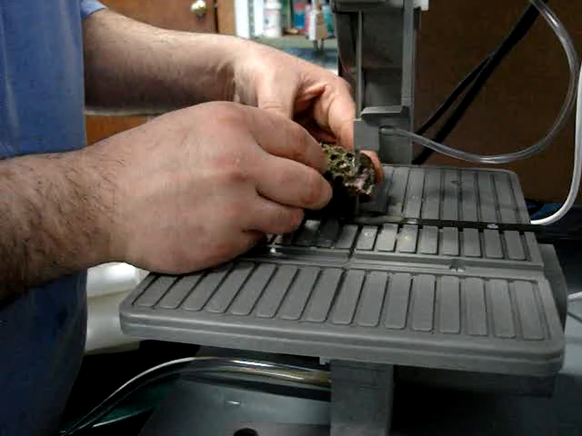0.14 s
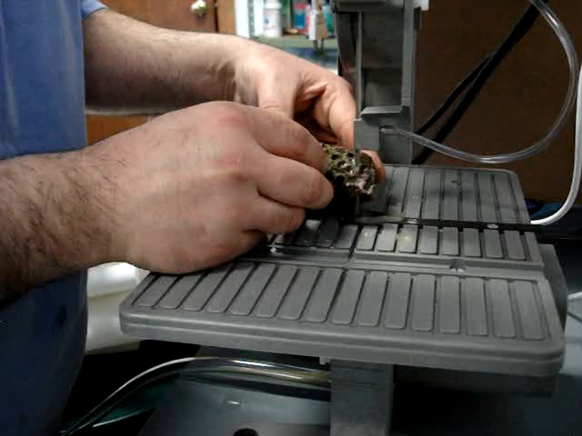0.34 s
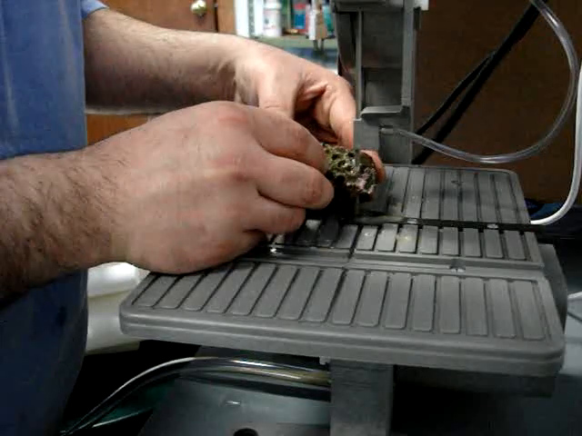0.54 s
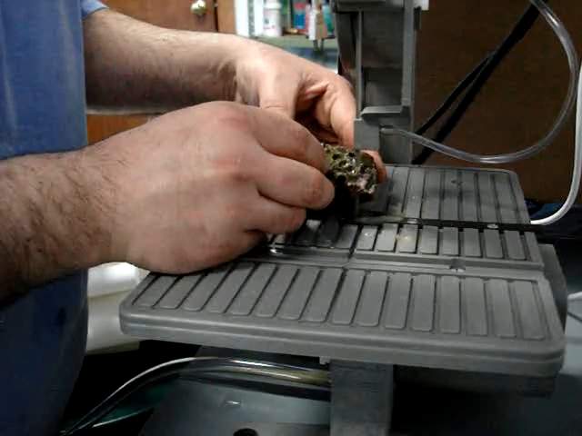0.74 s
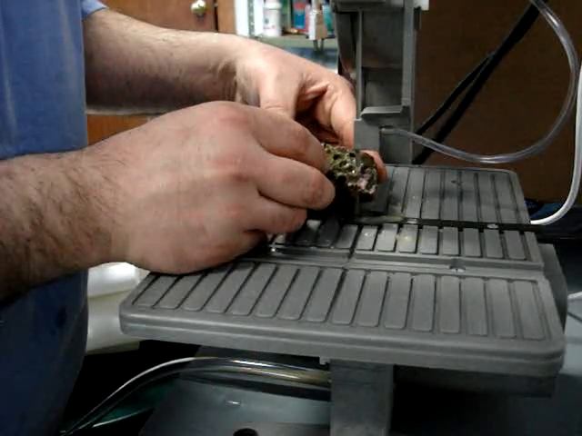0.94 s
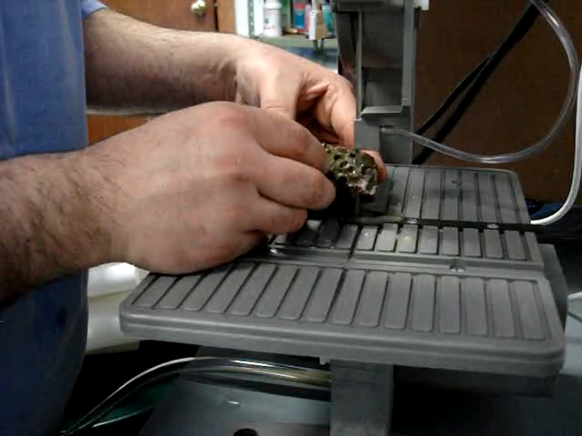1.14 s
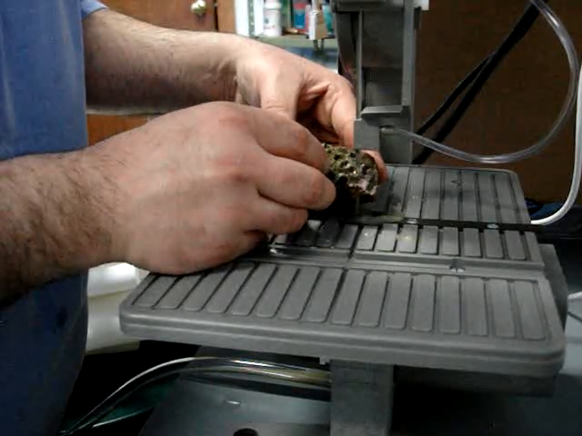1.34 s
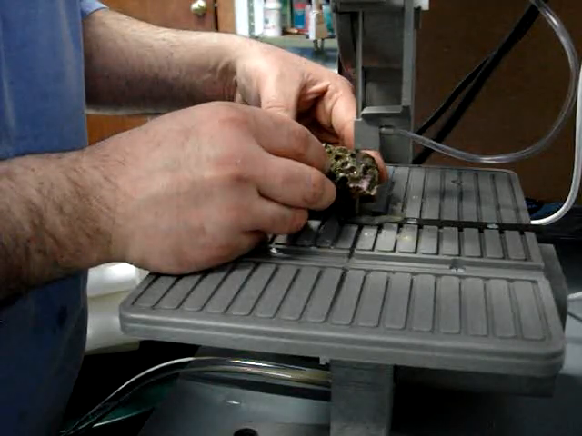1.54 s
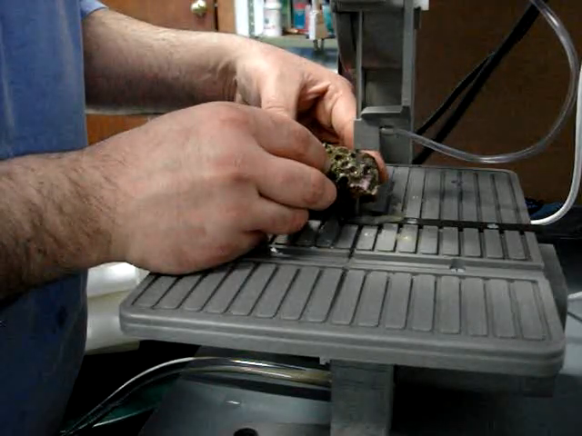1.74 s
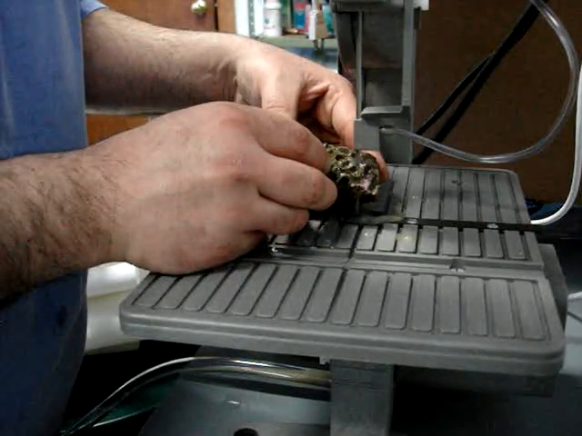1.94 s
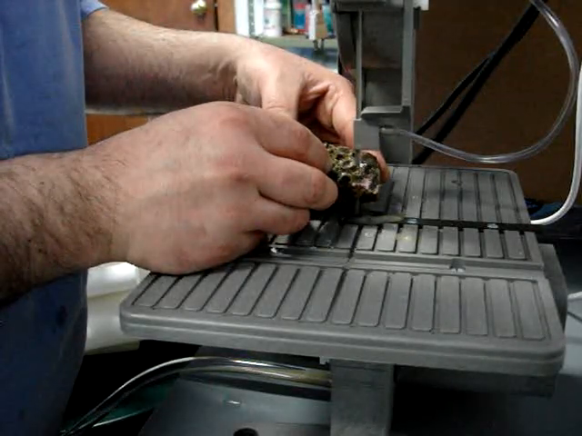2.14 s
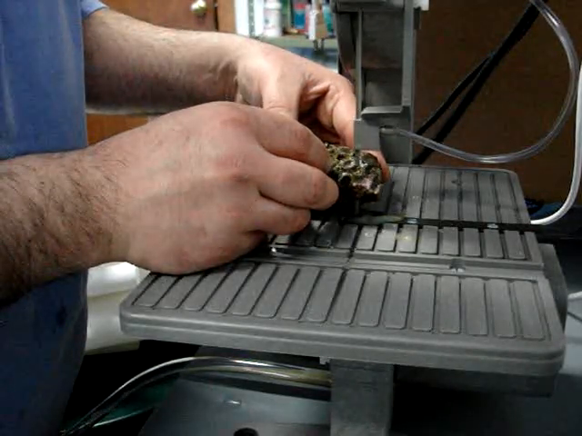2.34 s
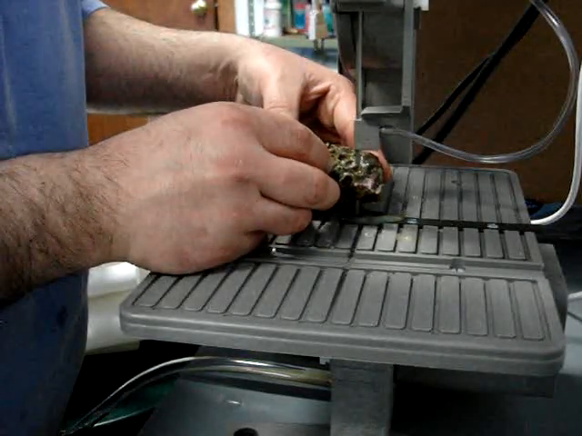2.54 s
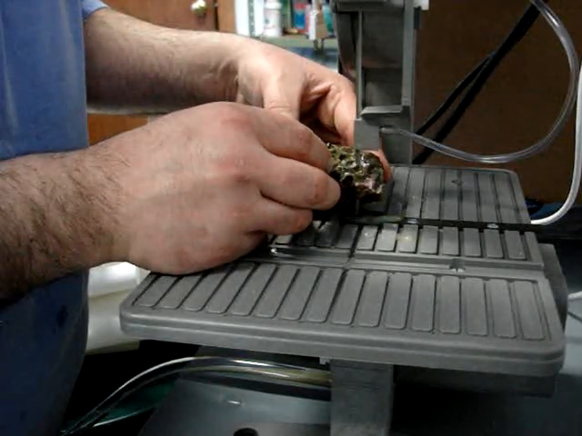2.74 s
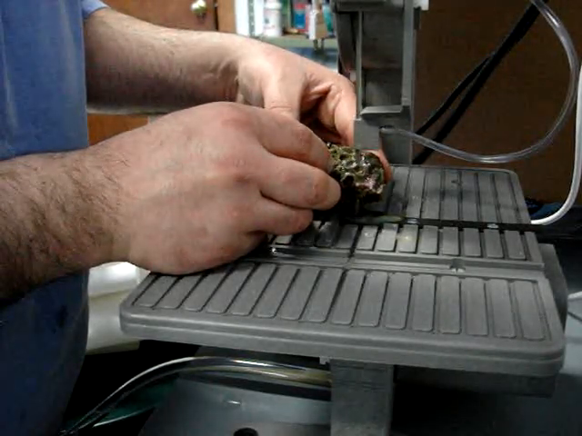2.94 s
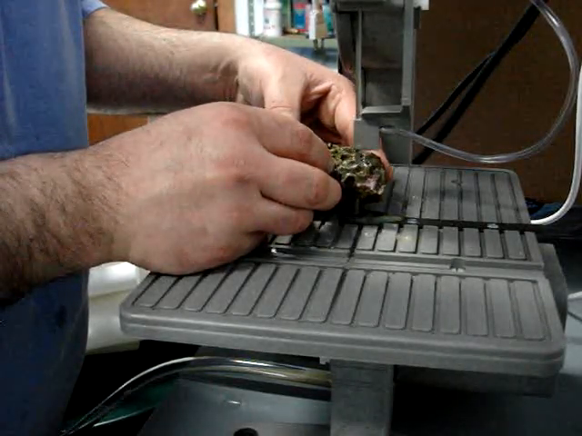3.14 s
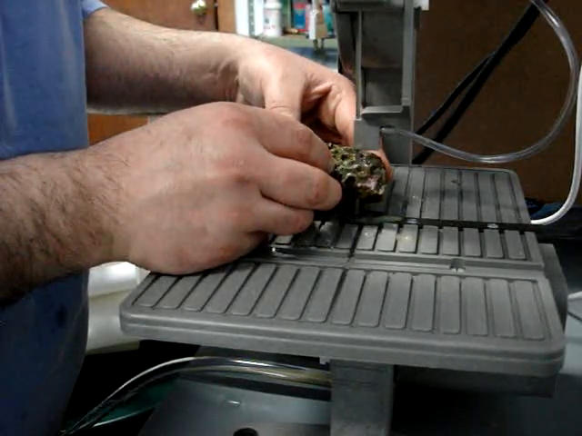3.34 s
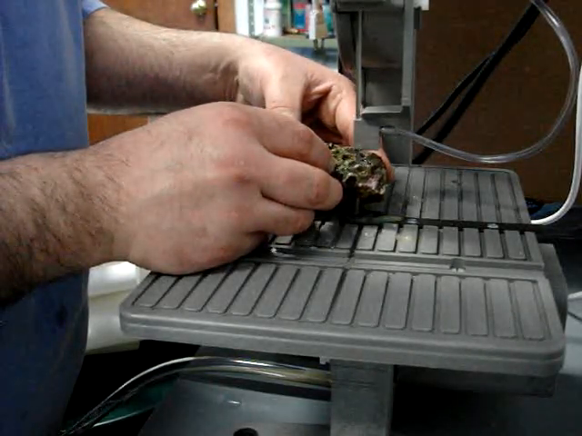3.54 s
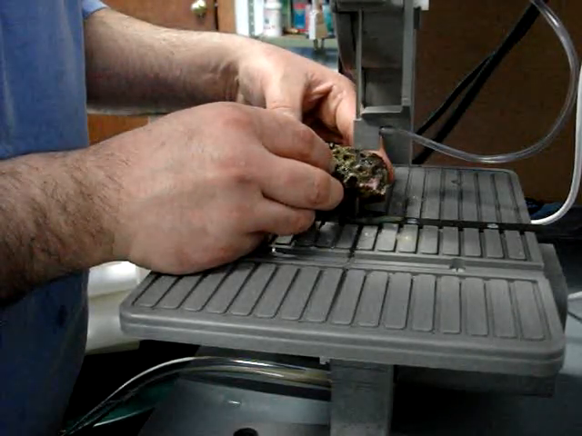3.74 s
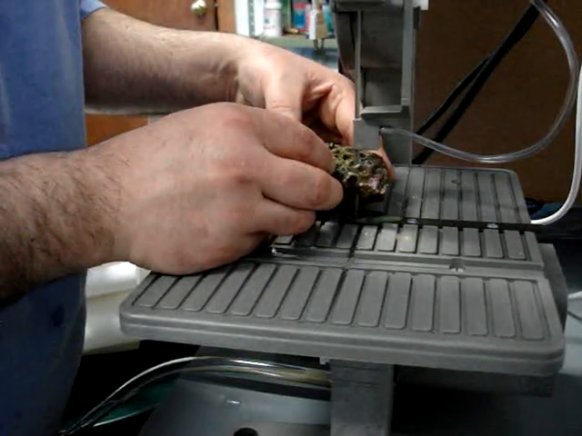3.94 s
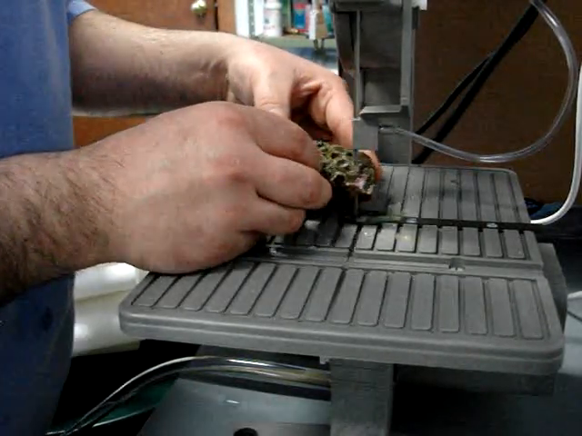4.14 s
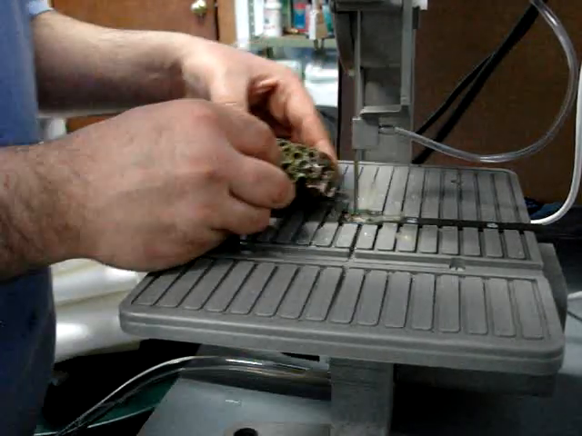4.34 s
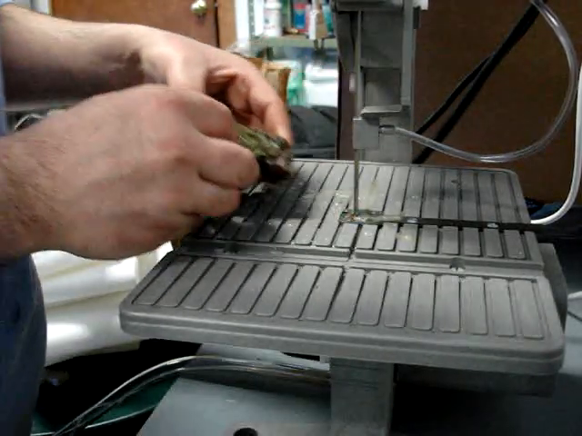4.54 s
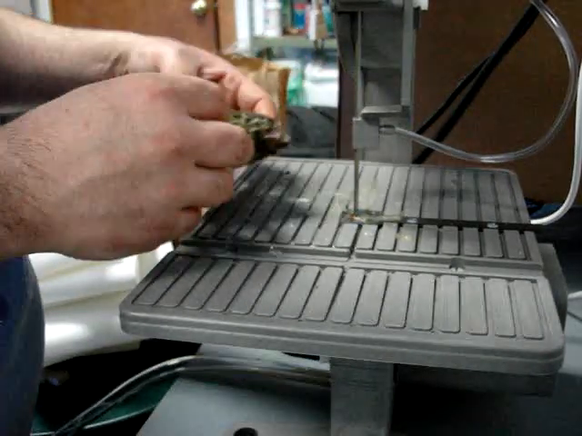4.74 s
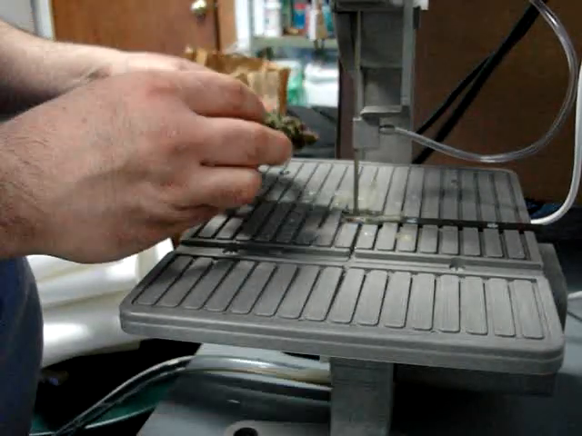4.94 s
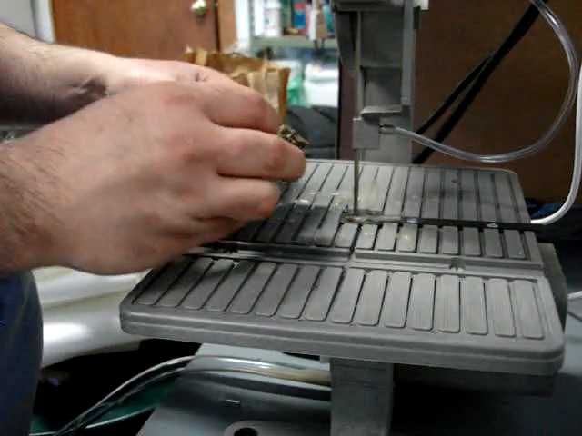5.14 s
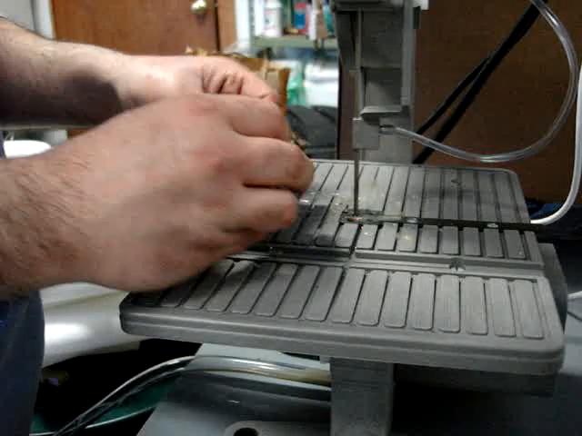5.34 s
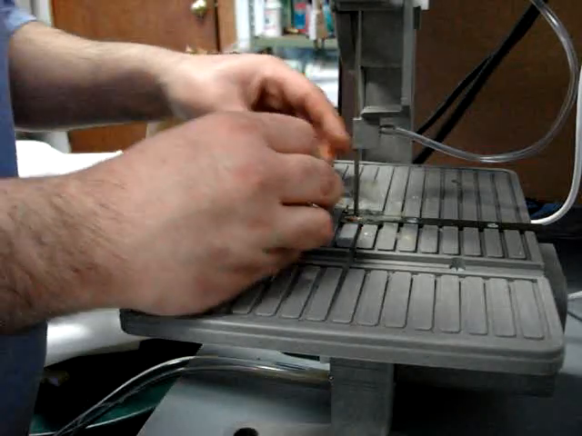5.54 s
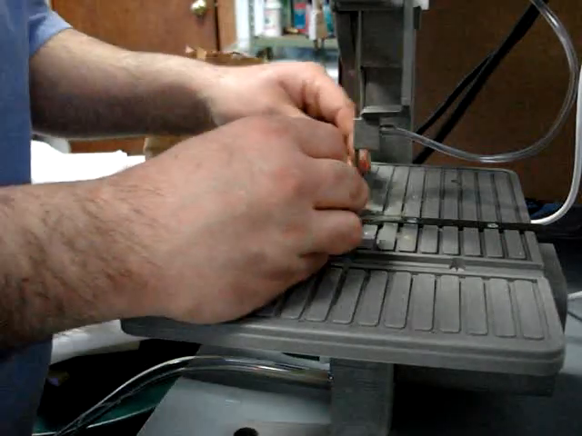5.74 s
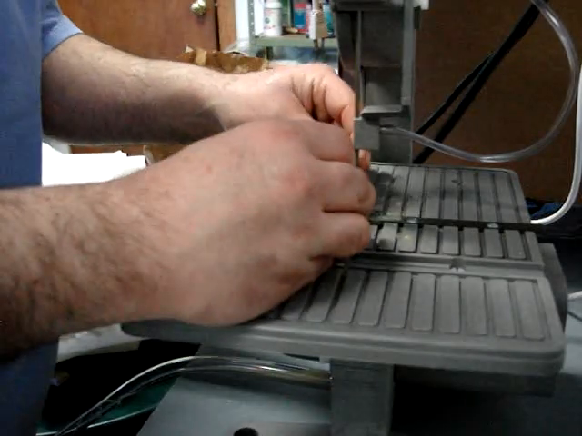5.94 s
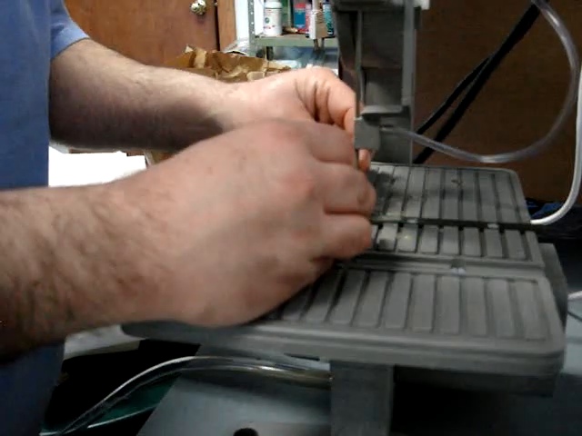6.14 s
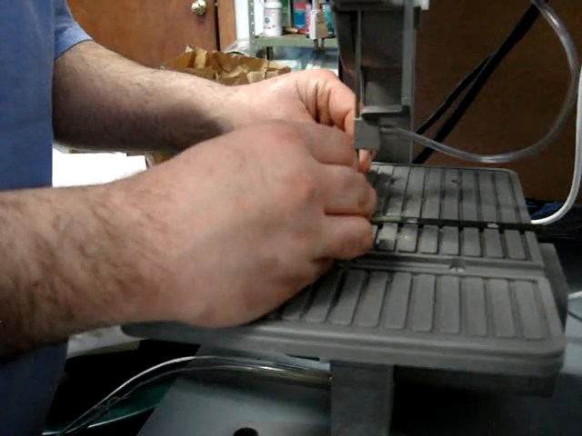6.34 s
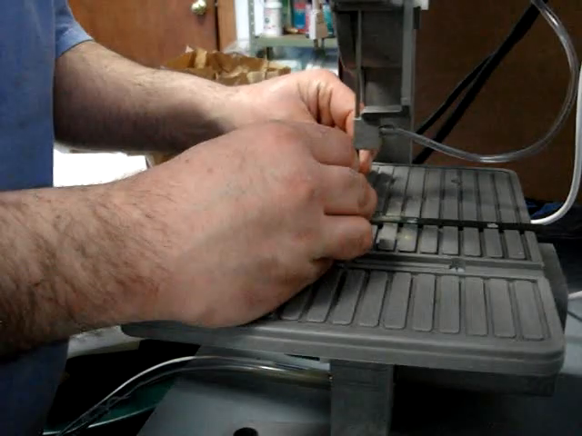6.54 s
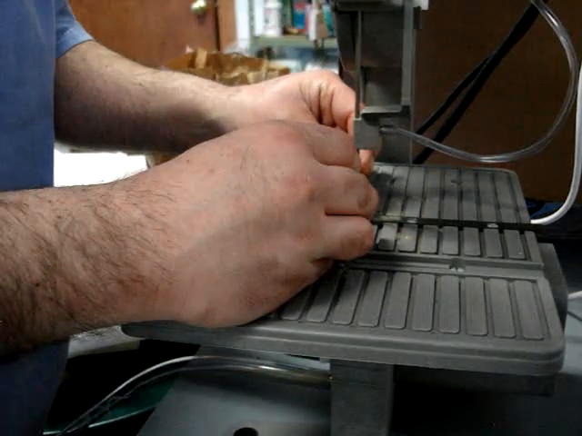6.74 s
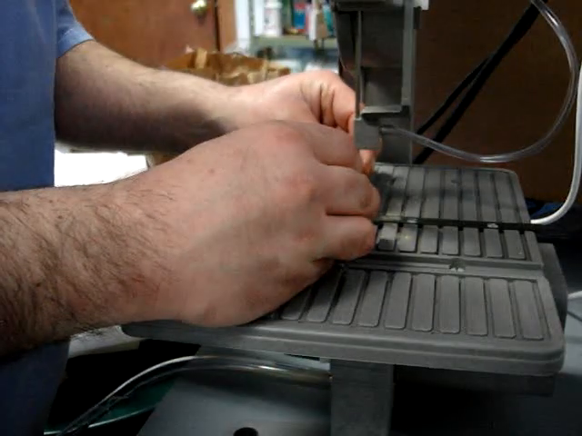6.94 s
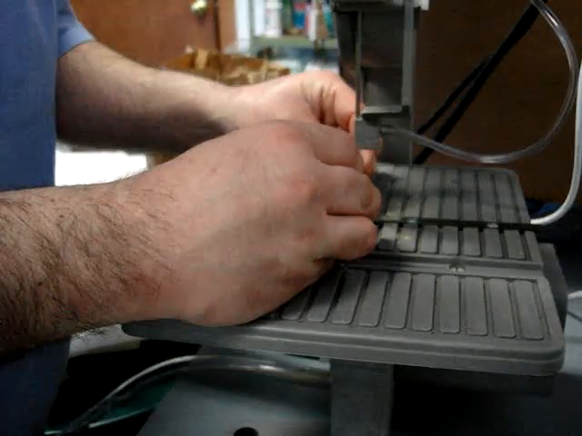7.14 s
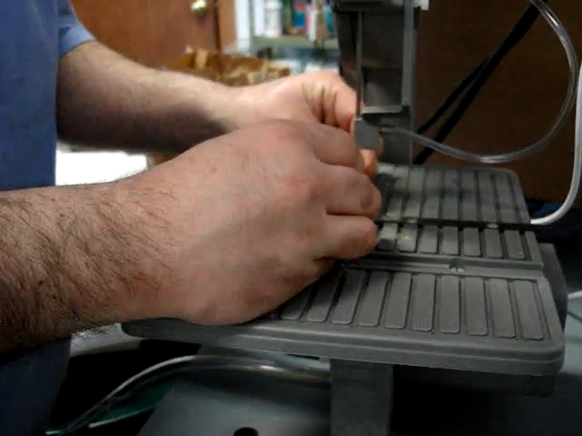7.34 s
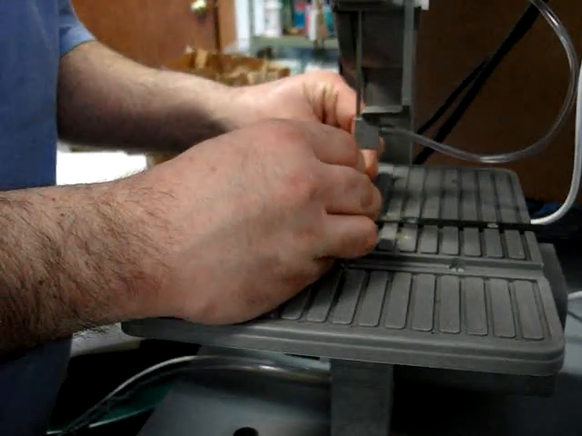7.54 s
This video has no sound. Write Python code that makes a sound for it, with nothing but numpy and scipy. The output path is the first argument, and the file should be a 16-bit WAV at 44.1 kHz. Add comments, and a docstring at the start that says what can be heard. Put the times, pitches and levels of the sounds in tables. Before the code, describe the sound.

A small band saw grinds through coral with a gritty, ringing hiss, squeaks free, drones louder, then starts a second cut.

```python
"""Band saw cutting coral

A piece of coral is pushed through a small diamond band saw on a workbench. Grit grinds, the blade chatters in
its guides and a hissing ring shifts with the push. The blade squeals as the cut breaks through, the drone
swells up over the next second or so, and a second cut begins. Chips snap off and the table thuds softly. One
close microphone in a small room."""
import sys
import numpy as np
from scipy import signal
from scipy.fft import rfft, irfft
from scipy.io import wavfile

SR = 44100
rng = np.random.default_rng(int(sys.argv[2]) if len(sys.argv) > 2 else 0)


def digitize_waveform(pressure):
    """Quantize a signal to 16-bit integers and store it at the path in sys.argv[1].

    Rows of a 2-D input are taken as channels; values are limited to [-1, 1].
    """
    field = np.atleast_2d(pressure).T
    bounded = np.clip(field, -1, 1)
    quanta = np.round(bounded * 32767).astype(np.int16)
    wavfile.write(sys.argv[1], SR, quanta)


N = 334719
TIME = np.arange(N) / SR
TOUCH_S, LEAVE_S = 0.018, 0.021  # time the coral takes to meet and to leave the blade

# How the hand feeds the coral in each cut: t/s, grit level/dB, fizz level/dB, ring of the slot f/Hz
FIRST_CUT = [(0, -29.5, -31, 4730), (0.22, -38.5, -31, 4740), (0.7, -32.5, -29, 4760),
             (1.25, -34, -27.5, 7000), (1.92, -35, -28, 6400), (2.18, -29.5, -27, 4400),
             (3.08, -30, -30, 4060), (3.38, -33.5, -30, 4900), (3.55, -28.5, -30.5, 5220),
             (4.0, -30, -28, 4930), (4.09, -43, -37.5, 3630), (4.33, -41, -34.5, 3200)]
SECOND_CUT = [(6.47, -39, -35.5, 3060), (6.8, -37.5, -31.5, 3930), (7.12, -35.5, -31.5, 3660),
              (7.2, -27.5, -30, 5600), (7.59, -32.5, -26, 5700)]


def hand_feed(chatter_db=(-20, -12.5), chatter_growth=0.51):
    """The push sets the strength of grit, fizz and chatter in both cuts, and the pitch of the slot."""
    strengths = np.zeros((3, N))
    for cut, base_db in zip((FIRST_CUT, SECOND_CUT), chatter_db):
        grit_db, fizz_db, _ = curve(cut)
        strengths += contact(cut) * gain_of([grit_db, fizz_db, base_db + chatter_growth * grit_db])
    slot_hz = curve(FIRST_CUT + SECOND_CUT)[2]
    return (*strengths, slot_hz)


# Tone colour of the coarse grit and of the fine fizz: f/Hz, relative level/dB
GRIT_COLOUR = [(300.0, -25.5), (1500.0, -24), (3200.0, -5), (3900.0, -4), (4600.0, 2.5), (5700.0, -10),
               (6300.0, -39.5), (7200.0, -1.5), (10000.0, -19.5)]
FIZZ_COLOUR = [(1000.0, -63), (5500.0, -2.5), (6700.0, -6), (7500.0, -8), (8100.0, -6.5), (8800.0, -5),
               (9400.0, -4.5), (10000.0, -13.5)]
# Pitches at which the steel blade and its wheels ring: f/Hz, width/Hz, boost/dB
BLADE_RINGS = [(244.7, 19, 9.5), (467, 47, 8.5), (1274, 62, 12), (1383, 140, 6), (1715, 120, 3),
               (2596, 260, 7.5), (2950, 90, 2.5), (3680, 73, 5.5), (3850, 70, 2), (3973, 110, 6.5),
               (4390, 70, 6), (4500, 80, 0), (4960, 180, 4.5), (5860, 96, 7), (6780, 190, 6.5)]


def grinding(turns, drone_db, coarse, fine, slot_hz, flicker_db=3.0):
    """Diamond grains scratch the coral and the guides; the pressure ripples as the wheels turn."""
    # Even the free blade rubs its guides; that hiss gets louder along with the drone.
    coarse = np.hypot(coarse, gain_of(0.69 * drone_db - 17.5))
    fine = np.hypot(fine, gain_of(0.72 * drone_db - 19.5))
    ripple_db = 0.62 * np.cos(2 * np.pi * turns) + np.cos(8 * np.pi * turns)
    pressure = gain_of(ripple_db + 0.95 * wander(31))
    grit = body(rng.standard_normal(N) * pressure, GRIT_COLOUR, BLADE_RINGS)
    fizz = body(rng.standard_normal(N) * pressure, FIZZ_COLOUR, BLADE_RINGS)
    treble = signal.sosfiltfilt(signal.butter(4, 7500, "high", fs=SR, output="sos"), fizz)
    fizz = fizz - treble + treble * gain_of(flicker_db * wander(98))  # the treble flickers
    return coarse * grit + fine * fizz + np.sqrt(coarse * fine) * slot_ring(pressure, slot_hz)


def slot_ring(pressure, hz, width_hz=900):
    """Scratches make the sawn slot ring with a hiss whose pitch slides as the coral is pushed."""
    spin = np.exp(2j * np.pi * np.cumsum(hz) / SR)
    decay = np.exp(-np.pi * width_hz / SR)
    scratches = impacts(20000, 1.0) * pressure
    # Dividing by spin, smoothing and multiplying back keeps only the sound near hz.
    ring = spin * signal.lfilter([1], np.poly([decay, decay]), scratches / spin)
    return gain_of(-6) * normalise(ring.real)


# Tone colour of the blade slapping its guides: f/Hz, relative level/dB
CHATTER_COLOUR = [(100.0, -61.5), (400.0, -10), (900.0, -2.5), (1120.0, -12.5), (1300.0, -2), (1600.0, 1),
                  (2100.0, -4), (2700.0, -5), (3300.0, -2), (4500.0, -9), (9000.0, -32)]


def chatter(turns, drone_db, load, whine_hz=1715, hz_per_db=2.5, build_db=3.5):
    """The blade slaps its guides and whines in them, hardest twice in each turn of the wheels."""
    sway = gain_of(0.85 * np.cos(2 * np.pi * turns) + 1.8 * np.cos(4 * np.pi * turns))
    free_running = gain_of(0.78 * drone_db - 11.5)
    slaps = body(normalise(impacts(9000, 0.69) * sway), CHATTER_COLOUR, BLADE_RINGS)
    pitch_hz = whine_hz + hz_per_db * (drone_db - drone_db.mean())
    whine = normalise(sway * tone(pitch_hz, .015, 60, .6, 40))
    depth = contact(FIRST_CUT) * (TIME / FIRST_CUT[-1][0] - .5)
    whine_gain = by_cut(-7, -5, -7) * gain_of(build_db * depth)  # grows as the first cut deepens
    return np.hypot(load, free_running) * (slaps + whine_gain * whine)


# Squeals as the cut breaks through: start t/s, length/s, level/dB
SQUEALS = [(4.24, 0.022, -21.5), (4.281, 0.067, -23)]
# Tone colour of their scrape: f/Hz, relative level/dB
SQUEAL_COLOUR = [(500, -34), (4000, -6), (7900, -11), (8400, 2), (9800, -4.5)]
# Pitches at which the squeals ring: f/Hz, width/Hz, boost/dB
SQUEAL_RINGS = [(4640, 330, 18), (8440, 200, 3), (9240, 300, 3)]


def squeal(rise_s=0.0058, fall_s=0.014):
    """The last sliver of coral drags on the blade and makes it sing."""
    drag = sum(gain_of(db) * held(s, s + length, rise_s, fall_s) for s, length, db in SQUEALS)
    scrape = rng.standard_normal(N) * drag * gain_of(.5 * wander(120))
    return body(scrape, SQUEAL_COLOUR, SQUEAL_RINGS)


# Notes of the lightly touched blade: f/Hz, width/Hz, boost/dB
GRAZE_RINGS = [(3830, 190, 26), (4470, 260, 15)]


def graze(start_s=6.44, length_s=.78, fade_s=.2, level_db=-36.5, uneven_db=2.5):
    """Lightly touched as the second cut begins, the blade rings in two thin, unsteady notes."""
    touch = held(start_s, start_s + length_s, TOUCH_S, fade_s)
    touch *= gain_of(level_db + uneven_db * wander(19))
    return body(rng.standard_normal(N) * touch, GRIT_COLOUR, GRAZE_RINGS)


# Chips snapping off the coral: t/s, relative level/dB
CHIPS = [(3.863, -10), (4.1, -11), (6.481, -12), (6.639, -9), (7.052, -14), (7.176, -5)]


def chips(decay_s=.0015):
    """Each chip is a short crack that rings the blade."""
    fade = np.exp(-TIME[:SR // 50] / decay_s)
    cracks = signal.oaconvolve(strikes(CHIPS), fade)[:N] * rng.standard_normal(N)
    return gain_of(-9) * body(cracks, GRIT_COLOUR, BLADE_RINGS)


# How loud the drone of motor and frame sounds: t/s, level/dB
DRONE = [(0, -41.5), (0.3, -45), (0.6, -43), (2.0, -42), (2.5, -39.5), (3.55, -41), (4.07, -34.5),
         (4.38, -39), (5.05, -25), (5.5, -22.5), (6.25, -21), (6.43, -19.5), (6.7, -29.5), (7.25, -31.5),
         (7.59, -38.5)]
# The motor's tones: f/Hz, relative level/dB, pitch drift as a share of f
MOTOR_TONES = [(119, -36, .002), (149.4, -32, .002), (219.8, -32, 0.0036), (360, -29, 0.008),
               (418.5, -28.5, 0.0036), (454, -27, 0.0028), (647, -18, 0.004), (797, -13.5, .003)]
# Tone colour of the rattling frame: f/Hz, relative level/dB
FRAME_COLOUR = [(40.0, -35), (90.0, -29.5), (140.0, -21), (250.0, -16), (380.0, -1), (540.0, -10.5),
                (720.0, -1), (1100.0, -7.5), (1500.0, -6), (1950.0, -5), (2150.0, -9), (3200.0, -24),
                (6000.0, -12), (10000.0, -48)]
# Pitches at which the cast frame and table ring: f/Hz, width/Hz, boost/dB
FRAME_RINGS = [(245, 20, 6), (445, 45, 3), (694, 42, 6.5), (793, 26, 6), (900, 24, 5), (958, 36, 7),
               (1024, 25, 7), (1175, 25, 8), (1270, 40, 8), (1345, 50, 9), (1425, 30, 5), (1735, 50, 7),
               (1782, 30, 7), (1916, 40, 7), (2500, 160, 7)]


def motor(drive_hz=698, uneven_db=1.55, boom_growth=1.86):
    """Bearings and drive rattle the frame under wavering tones; the bass swells faster than the rest."""
    drone_db, = curve(DRONE)
    knocks = impacts(8000, 0.94) * gain_of(uneven_db * wander(45))
    rattle = body(knocks, FRAME_COLOUR, FRAME_RINGS)
    bass_filter = signal.butter(2, [130, 280], "band", fs=SR, output="sos")
    boom = normalise(signal.sosfilt(bass_filter, impacts(3000, 0.97)))
    hum = sum(gain_of(db) * tone(hz, drift, 19.4, 0.39, 20) for hz, db, drift in MOTOR_TONES)
    drive = by_cut(-8, -13.5, -7) * tone(drive_hz, 0.009, 20.3, 0.42, 18)
    drone = gain_of(drone_db) * (gain_of(-1) * (rattle + hum) + drive)
    return drone + gain_of(boom_growth * drone_db - 9) * boom


# Dull bumps on the table: t/s, relative level/dB
BUMPS = [(0.119, -41), (0.234, -39), (1.204, -42), (1.429, -44), (1.77, -46), (2.424, -48), (2.749, -45),
         (3.384, -44), (4.109, -52), (4.279, -40), (5.919, -49), (6.209, -49), (6.489, -41)]


def table_bumps(rise_s=0.0044, per_s=110):
    """Soft pushes thud on the table; many tiny ones make it tremble, most while the blade cuts."""
    age = TIME[:SR // 10] / rise_s
    push = -age * np.exp(1 - age)
    tremble = normalise(signal.oaconvolve(impacts(per_s, 0.9), push)[:N])
    thuds = gain_of(1) * signal.oaconvolve(strikes(BUMPS), push)[:N]
    motion = thuds + by_cut(-57, -65, -72) * tremble
    return signal.sosfilt(signal.butter(1, 15, "high", fs=SR, output="sos"), motion)


# How long the room's echo takes to fade by 60 dB: f/Hz, t/s
ECHO_FADE = [(200, 0.3), (2000, 0.2), (10000, 0.11)]


def room(x, size=16384):
    """The walls of a small workshop send back scattered echoes; the treble dies first."""
    echoes = rng.standard_normal(size) * (rng.random(size) < 2500 / SR) * (TIME[:size] > .004)
    hz, t, spectrum = signal.stft(echoes, SR, nperseg=256)
    fade = gain_of(-60 * t / value_at(ECHO_FADE, hz)[:, None])
    tail = signal.istft(spectrum * fade, SR, nperseg=256)[1]
    return signal.oaconvolve(x, tail / np.linalg.norm(tail))[:N]


def body(x, colour, rings, size=16384):
    """A solid part shaken by x gives it a tone colour and rings at its own pitches."""
    hz = np.fft.rfftfreq(size, 1 / SR)
    peaks_db = sum(boost / (1 + (2 * (hz - f) / width) ** 2) for f, width, boost in rings)
    db = value_at(colour, hz) + peaks_db
    log_gain = np.log(gain_of(np.r_[db, db[-2:0:-1]]))
    spectrum = np.exp(np.conj(signal.hilbert(log_gain)))  # the ring comes after the blow, never before
    ring = np.fft.ifft(spectrum).real[:size // 2]
    return signal.oaconvolve(x, ring / np.linalg.norm(ring))[:N]


def impacts(per_s, spread_db):
    """A stream of tiny blows at random times and of random strength."""
    size = rng.standard_normal(N) * gain_of(spread_db * np.minimum(rng.exponential(1, N), 4))
    return normalise(size * (rng.random(N) < per_s / SR))


def strikes(rows):
    """One click for each row of t/s, level/dB."""
    clicks = np.zeros(N)
    for s, db in rows:
        clicks[round(s * SR)] += gain_of(db)
    return clicks


def tone(hz, drift, drift_rate_hz, shake, shake_rate_hz):
    """A pure tone whose pitch drifts and whose strength shakes."""
    cycles = np.cumsum(hz * (1 + drift * wander(drift_rate_hz))) / SR
    return np.sqrt(2) * np.sin(2 * np.pi * cycles) * (1 + shake * wander(shake_rate_hz))


def wander(rate_hz):
    """A smooth random wobble of typical size 1, up to about the given rate."""
    hz = np.fft.rfftfreq(8192, 1 / 1000)  # one point per millisecond
    slow = irfft(rfft(rng.standard_normal(8192)) / np.sqrt(1 + (hz / rate_hz) ** 6))
    return normalise(np.interp(TIME * 1000, np.arange(len(slow)), slow))


def held(start, end, rise_s, fall_s):
    """Fades in from start, stays at 1, and fades out by end."""
    return np.clip(np.minimum((TIME - start) / rise_s, (end - TIME) / fall_s), 0, 1)


def contact(cut):
    """1 while the coral is on the blade in this cut, fading to 0 on either side."""
    return held(cut[0][0] - TOUCH_S, cut[-1][0] + LEAVE_S, TOUCH_S, LEAVE_S)


def by_cut(first_db, second_db, free_db):
    """A gain with one value in each cut and another while the blade runs free."""
    first = (first_db - free_db) * contact(FIRST_CUT)
    second = (second_db - free_db) * contact(SECOND_CUT)
    return gain_of(free_db + first + second)


def curve(rows):
    """Joins a table's rows with straight lines over time, one curve per column."""
    times, *columns = np.transpose(rows)
    return [np.interp(TIME, times, column) for column in columns]


def value_at(points, hz):
    """Reads a table between its frequencies, along a scale of octaves."""
    f, value = np.transpose(points)
    return np.interp(np.log(hz + 1), np.log(f + 1), value)


def gain_of(db):
    """Turns decibels into a number to multiply by."""
    return 10 ** (np.asarray(db) / 20)


def normalise(x):
    """Scales a signal to a typical size (rms) of 1."""
    return x / np.sqrt(np.mean(x ** 2) + 1e-20)


def scene(wheel_hz=8.8, room_db=-13):
    """The saw in its room: chatter and grinding share the turning wheels; both channels are alike."""
    turns = np.cumsum(wheel_hz * (1 + 0.0407 * wander(0.4))) / SR
    drone_db, = curve(DRONE)
    coarse, fine, load, slot_hz = hand_feed()
    saw = motor() + chatter(turns, drone_db, load) + grinding(turns, drone_db, coarse, fine, slot_hz)
    saw = saw + squeal() + graze() + chips()
    mono = saw + gain_of(room_db) * room(saw) + table_bumps()
    return np.array([mono, mono])


def record(dry, edge_hz=10130):
    """Cuts off the highest treble steeply."""
    lowpass = signal.firwin(1023, edge_hz, window=("kaiser", 9), fs=SR)
    return signal.oaconvolve(dry, lowpass[None], "same")


dry = scene()
out = record(dry)
digitize_waveform(out)
```